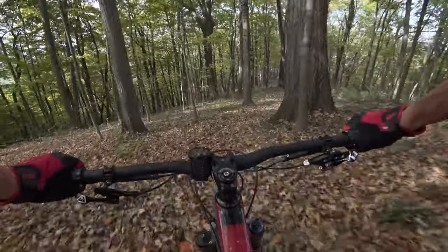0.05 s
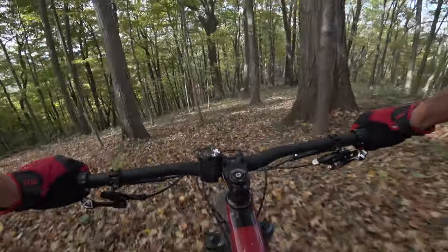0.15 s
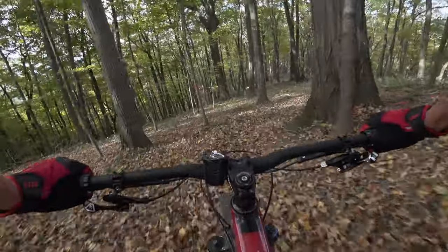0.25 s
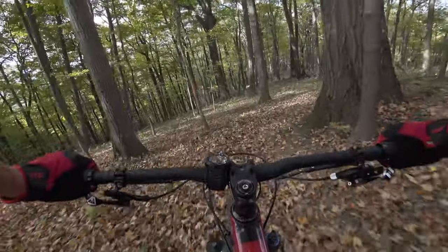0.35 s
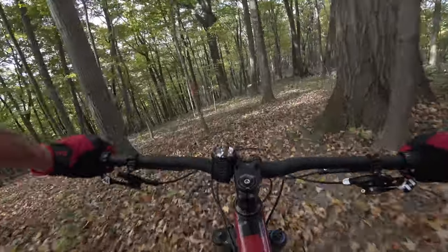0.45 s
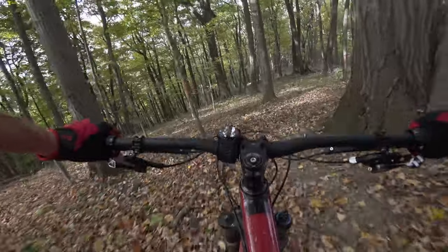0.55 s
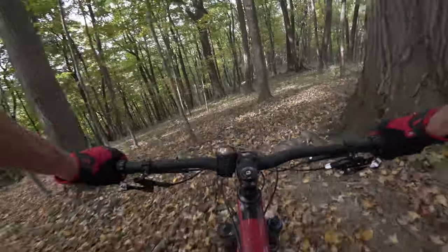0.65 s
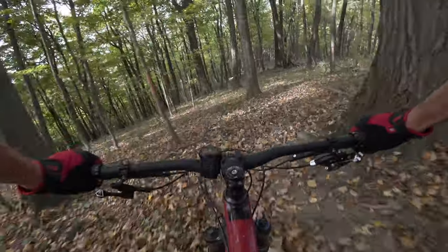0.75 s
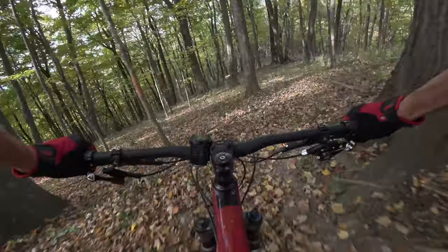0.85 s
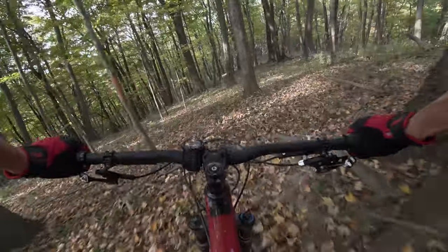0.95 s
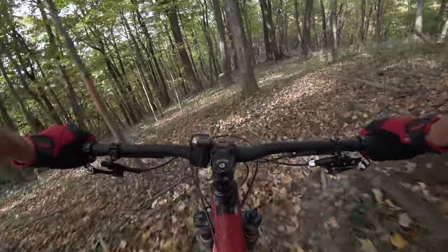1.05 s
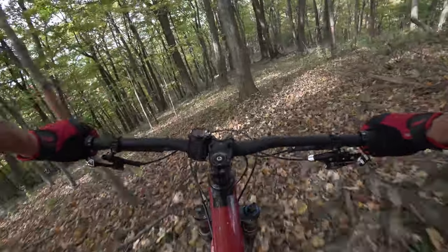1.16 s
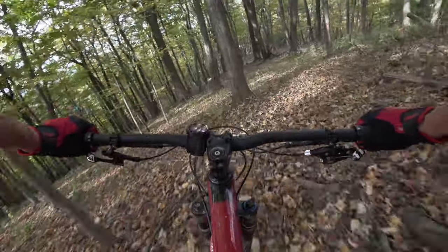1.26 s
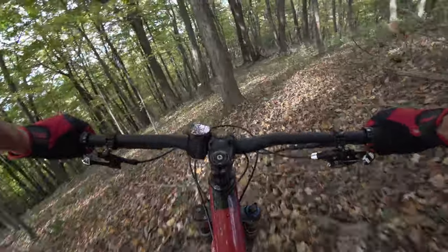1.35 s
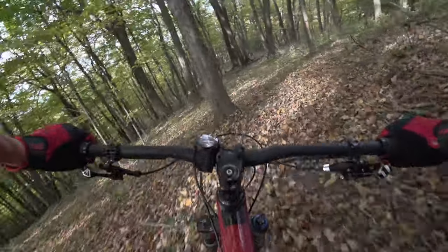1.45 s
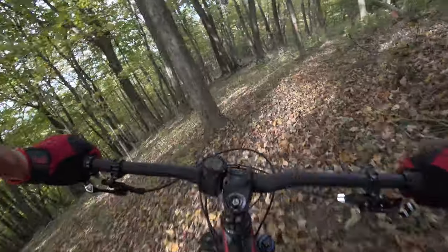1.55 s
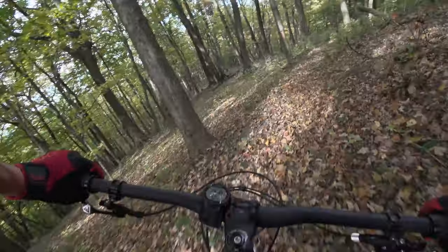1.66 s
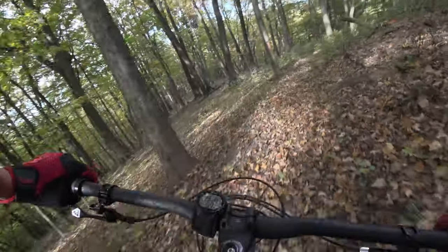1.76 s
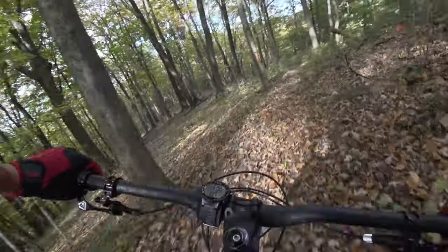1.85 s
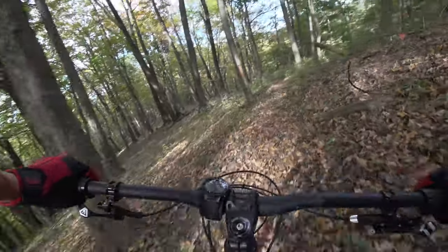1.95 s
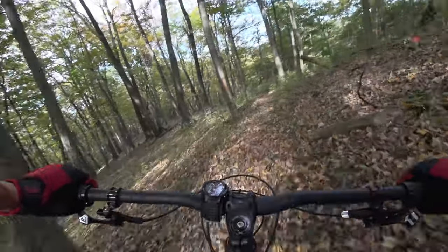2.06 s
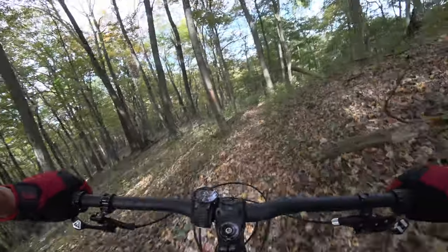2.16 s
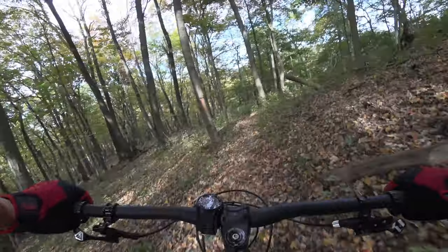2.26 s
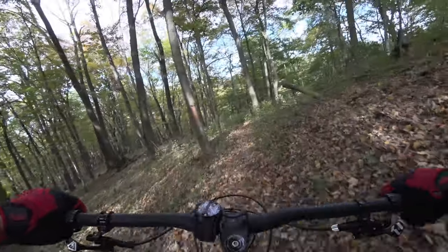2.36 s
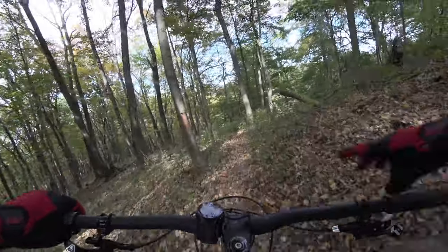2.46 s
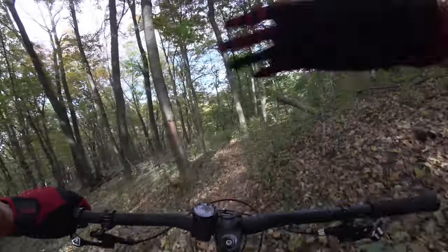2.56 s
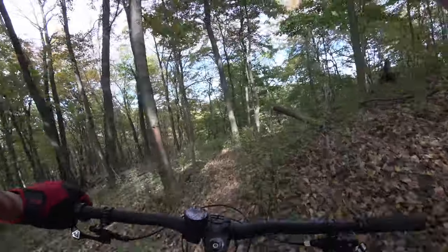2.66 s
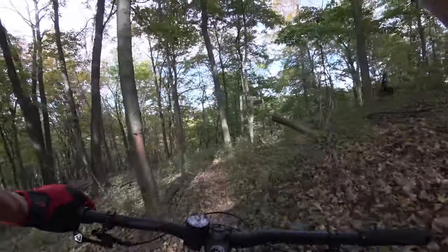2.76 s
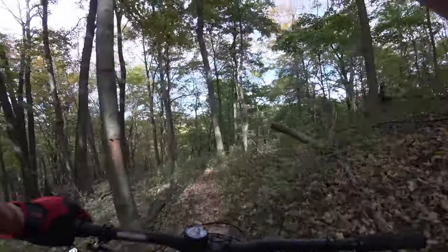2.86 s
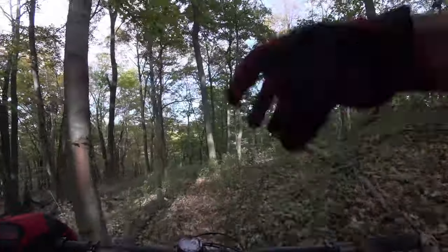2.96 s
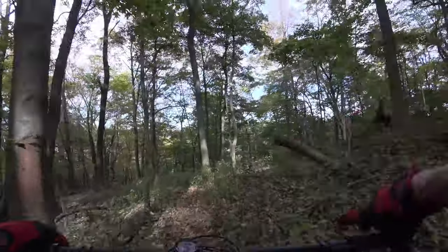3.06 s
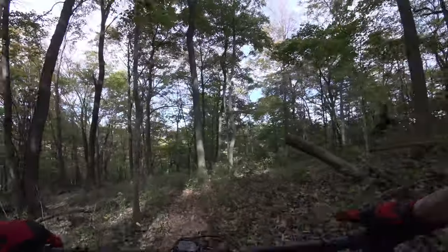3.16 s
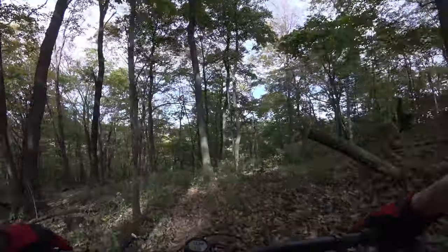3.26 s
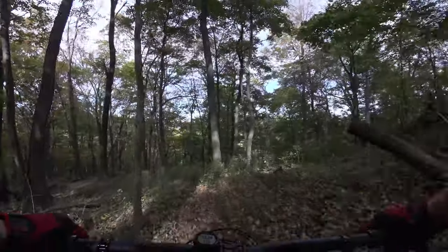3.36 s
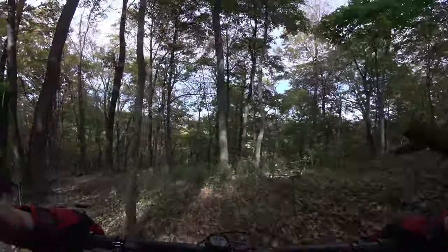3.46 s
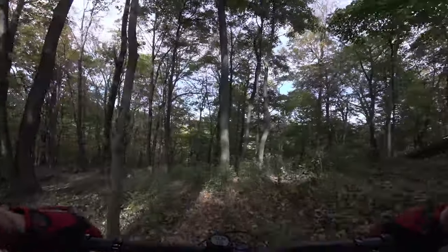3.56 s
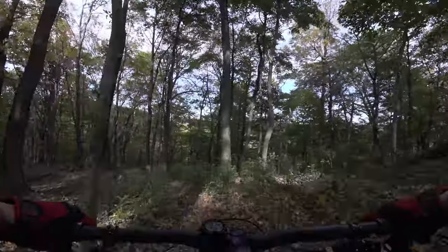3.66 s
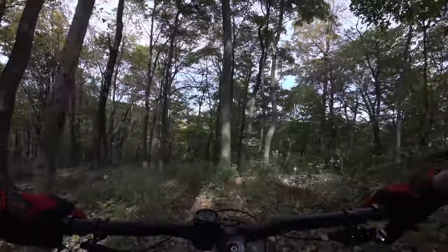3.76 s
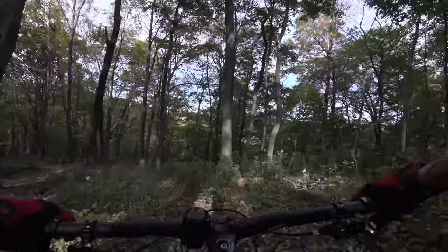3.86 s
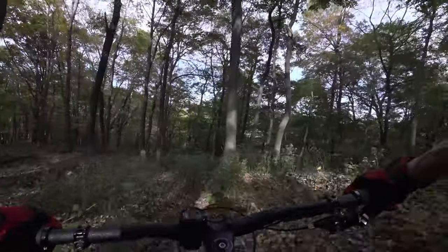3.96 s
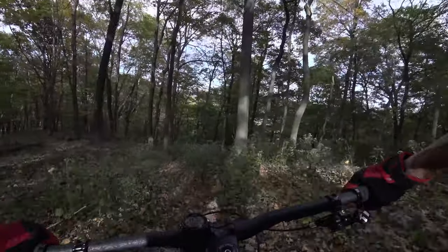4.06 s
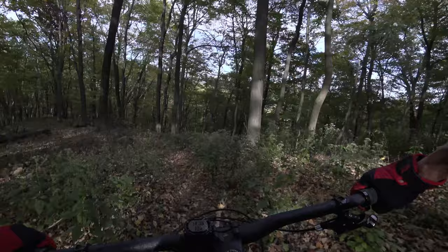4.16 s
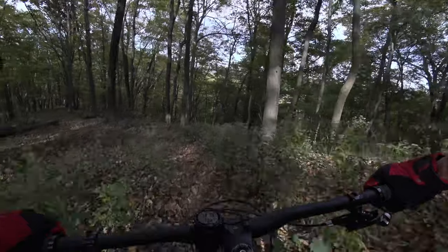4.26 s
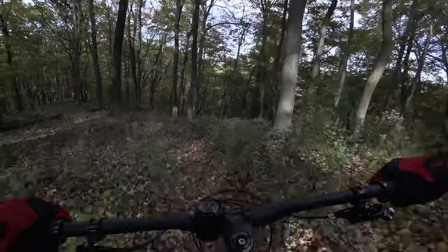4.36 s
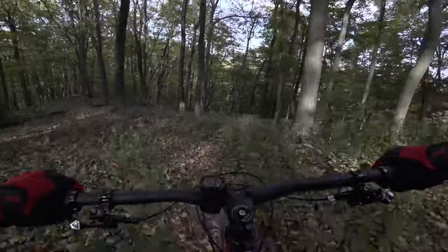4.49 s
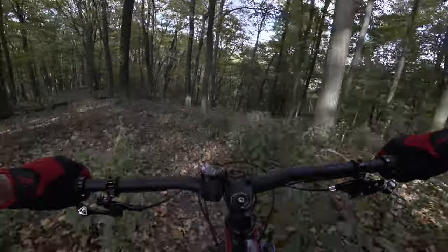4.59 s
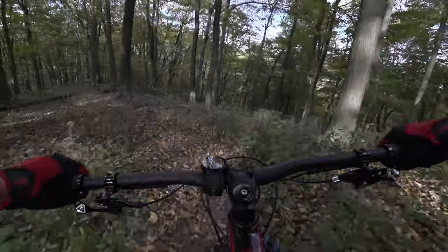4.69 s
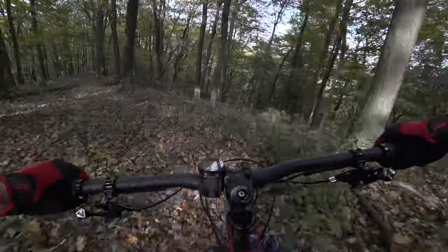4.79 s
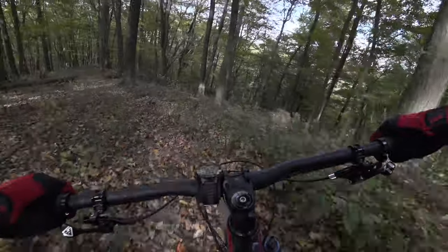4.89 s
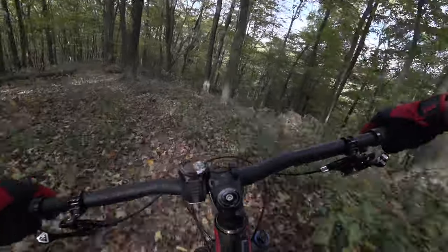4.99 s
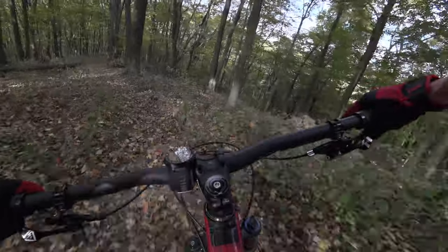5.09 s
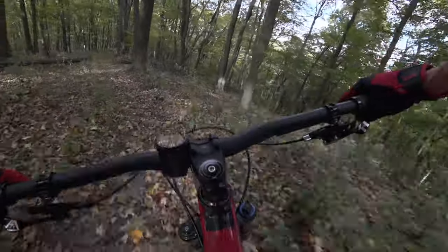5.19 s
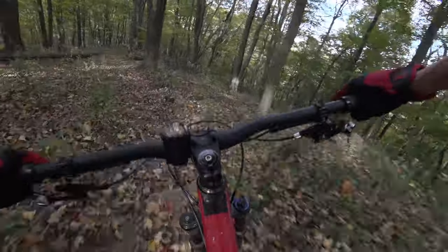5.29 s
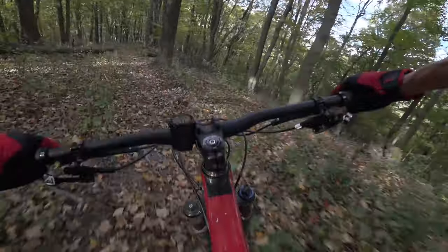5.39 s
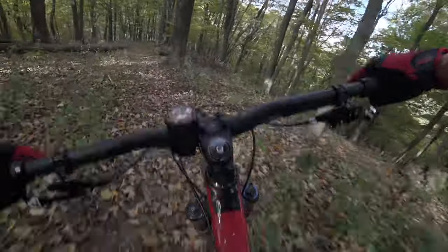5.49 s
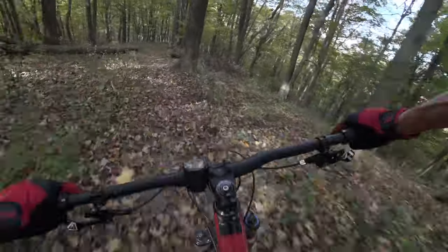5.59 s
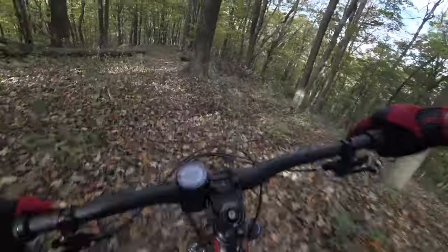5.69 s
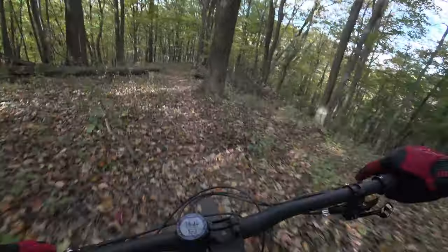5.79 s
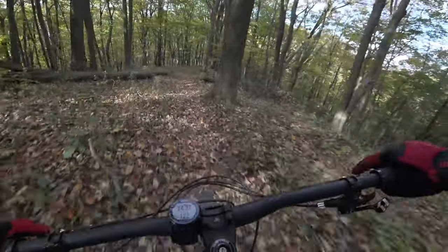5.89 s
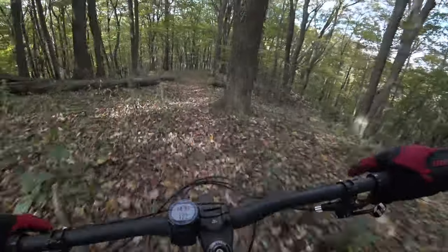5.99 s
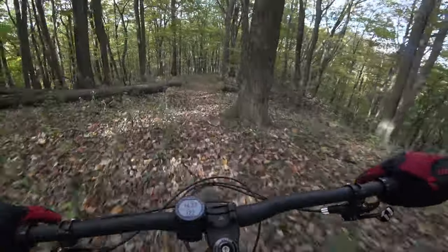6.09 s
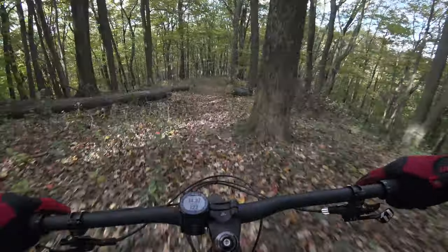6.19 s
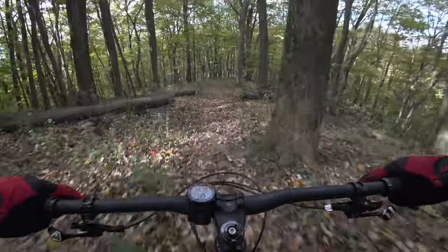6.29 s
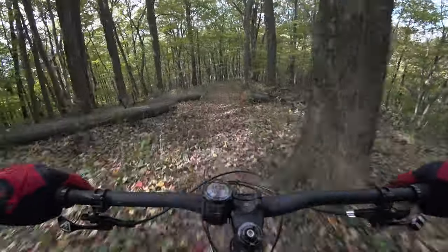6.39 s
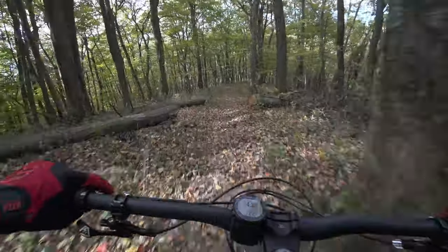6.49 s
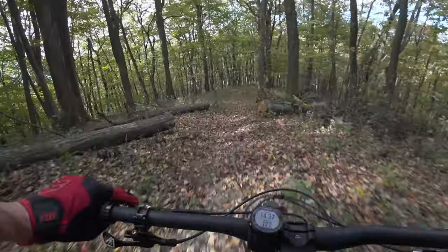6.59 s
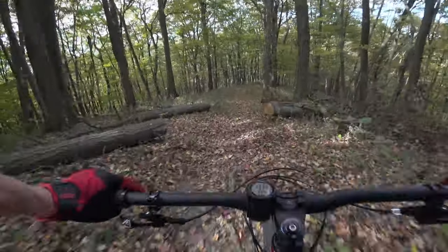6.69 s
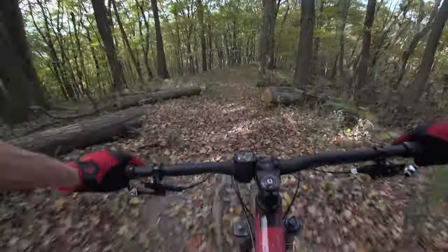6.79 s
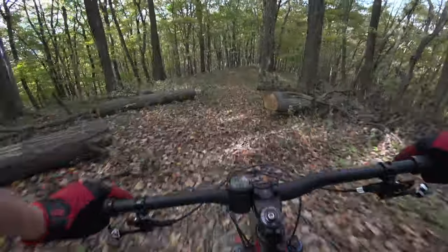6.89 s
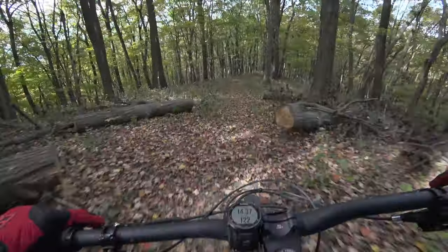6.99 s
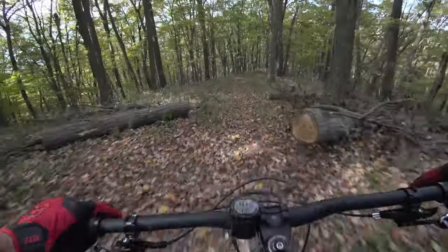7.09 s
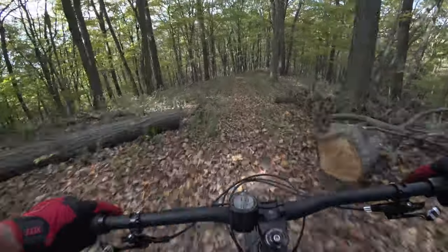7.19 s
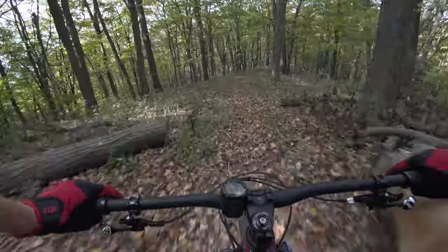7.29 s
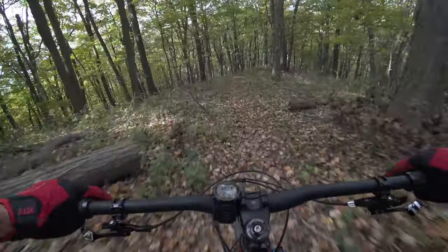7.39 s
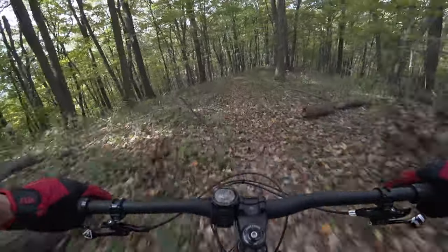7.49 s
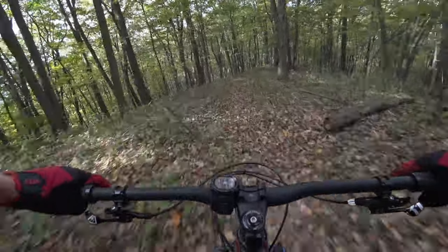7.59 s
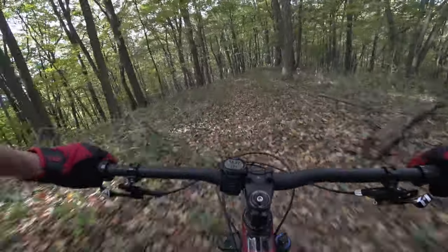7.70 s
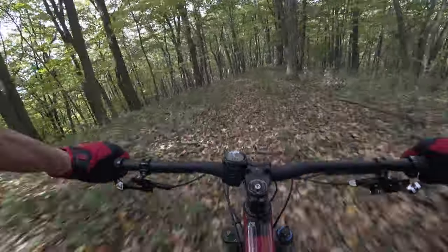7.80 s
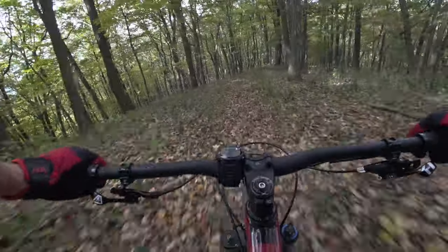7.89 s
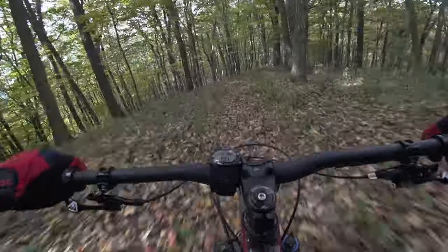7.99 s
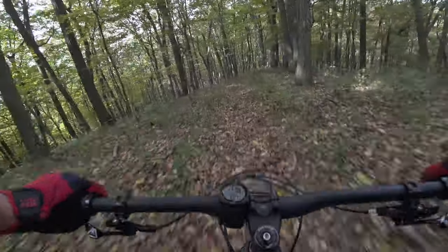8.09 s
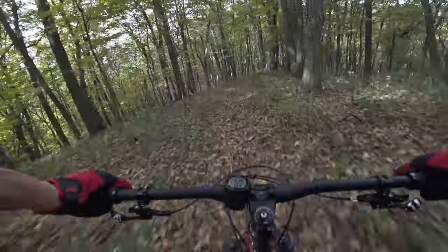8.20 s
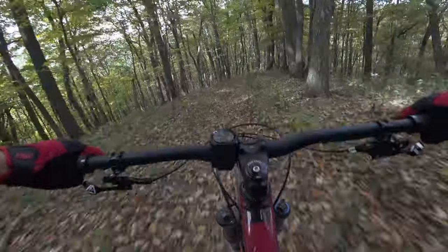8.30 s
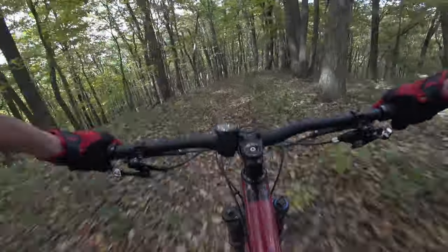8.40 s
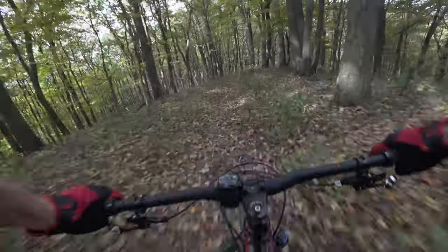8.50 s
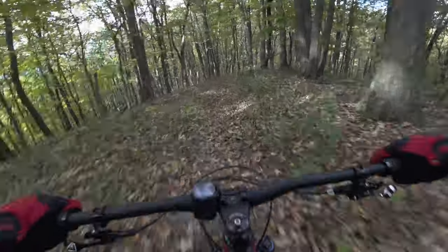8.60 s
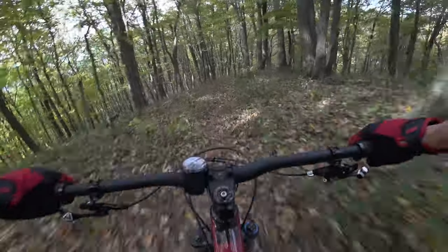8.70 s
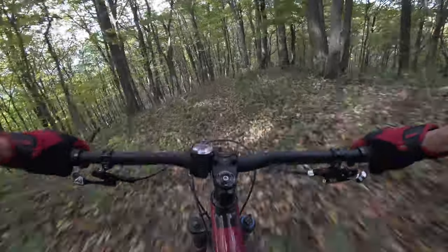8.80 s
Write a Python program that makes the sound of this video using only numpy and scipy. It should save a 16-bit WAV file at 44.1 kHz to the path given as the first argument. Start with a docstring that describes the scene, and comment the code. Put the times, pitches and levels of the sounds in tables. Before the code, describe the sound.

Heard from the rider's position, bicycle tyres plough through thick dry leaves in a dense, bright, continuous crackle. Twigs and roots knock the wheels with short woody clacks, and a brake disc squeals briefly near one second. The crackle thins around three seconds amid dull bumps and sharp snaps, then returns fuller and louder, with soft tyre drumming beneath it growing to the end.

```python
"""Dry leaves crackle densely under bicycle tyres that roll fast along a forest trail, heard by the rider.
The crackle is coloured noise gated by random cracks, with short damped tones for single leaves.
Beneath it the tyres drum and thud, as low noise beaten by uneven ground. Twigs and roots knock the wheels
as damped tones with a woody crack, single leaves snap as noise bursts, dull bumps are low damped tones,
and a brake disc sings once, a tone that swells and fades in bursts."""
import sys
import numpy as np
from scipy import signal
from scipy.fft import rfft, irfft, next_fast_len
from scipy.io import wavfile
from scipy.ndimage import uniform_filter1d, map_coordinates

SR = 44100
rng = np.random.default_rng(int(sys.argv[2]) if len(sys.argv) > 2 else 0)


def to_wav(s):
    """Save 16-bit WAV."""
    ch = np.atleast_2d(s).T  # columns
    pcm = np.round(np.clip(ch, -1, 1) * 32767)  # PCM
    wavfile.write(sys.argv[1], SR, pcm.astype(np.int16))


N = 390285  # length in samples

# Slow base levels of the ride. Each row: time in seconds, small cracks in dB, big leaves and stems in dB,
# tyre drumming in dB.
ROLL_LEVELS = [(0, -18.5, -26, -38), (0.5, -18, -26.5, -40), (1.1, -17, -24.5, -37), (1.7, -22, -29, -40.0),
               (2.4, -21, -28, -39.5), (3.1, -25, -33.5, -41), (3.7, -24, -33, -41.5),
               (4.4, -24, -30.5, -38.5), (4.9, -19.5, -27, -39), (5.4, -16, -23.5, -36),
               (6.2, -19.5, -25.5, -35.5), (6.6, -18.5, -25, -33), (7.1, -16, -23, -32.5),
               (7.8, -16.5, -23, -31.5), (8.3, -15.5, -22.5, -30), (8.85, -15.5, -22, -28)]


def amp(db):
    """Gain of a level in dB."""
    return 10 ** (np.asarray(db) / 20)


def unit(x):
    """Scale x to rms 1."""
    return x / np.sqrt(np.mean(x ** 2) + 1e-20)


def along(points, hz):
    """Read a curve of (Hz, value) points on a log frequency axis."""
    f, v = np.transpose(points)
    return np.interp(np.log(hz + 1), np.log(f + 1), v)


def curves(rows):
    """Draw one value per sample for each column after the time."""
    seconds, *columns = np.transpose(rows)
    return [np.interp(np.arange(N) / SR, seconds, column) for column in columns]


def wobble(rate):
    """A smooth random curve with rate knots a second."""
    knots = rng.standard_normal(int(N * rate / SR) + 4)
    return map_coordinates(knots, [np.arange(N) * rate / SR])


def filtered(x, response):
    """Multiply the spectrum of x by a complex response of frequency."""
    m = next_fast_len(N + SR // 4)
    return irfft(rfft(x, m) * response(np.fft.rfftfreq(m, 1 / SR)), m)[..., :N]


def high_pass(hz, edge_hz):
    """Response of two first-order high-passes in a row."""
    return (1j * hz / (edge_hz + 1j * hz)) ** 2


def cracks(rate, spread_db, life):
    """Envelope of rate random cracks a second, few large among many small, falling to 1/e in life seconds."""
    when, size = rng.random(N), rng.exponential(size=N)
    kicks = (when < rate / SR) * amp(spread_db * np.minimum(size, 4))
    return unit(signal.lfilter([1], [1, -np.exp(-1 / (life * SR))], kicks))


def grainy(spectrum, envelope, bed, grains=0):
    """Two unrelated noises of one colour, gated by the same cracks over a steady bed, plus any grains."""
    noise = rng.standard_normal((2, N)) * (bed + envelope)
    pair = unit(noise) + grains
    return unit(filtered(pair, lambda hz: amp(along(spectrum, hz))))


def dips_and_swells():
    """Brief level changes in dB: dips cut in fast, swells come more softly."""
    # Brief dips and swells of the crackle.
    # Each row: start in seconds, length in seconds, change in dB before smoothing.
    crackle_changes = [(0.02, 0.037, 2.5), (0.788, 0.035, 3.5), (1.976, 0.04, -1), (2.083, 0.027, 5.5),
                       (2.59, 0.048, -3), (2.664, 0.084, 4), (3.037, 0.015, 3.5), (3.064, 0.09, -2.5),
                       (3.215, 0.018, -6.5), (3.4, 0.085, 3.5), (3.616, 0.041, 6), (3.678, 0.05, 4.5),
                       (3.757, 0.026, -6.0), (3.951, 0.03, -3.5), (3.984, 0.031, 6), (4.023, 0.12, -4),
                       (4.164, 0.08, 4.0), (4.278, 0.032, 5), (4.43, 0.046, 5), (4.69, 0.049, -4),
                       (4.749, 0.044, -4.5), (4.854, 0.044, 3.5), (4.952, 0.064, -5.5), (5.136, 0.041, -4),
                       (5.173, 0.018, 2), (5.334, 0.034, -6), (5.506, 0.027, -8.5), (5.589, 0.023, -8.5),
                       (6.269, 0.068, -3.5), (6.67, 0.027, 3.5), (6.753, 0.038, -8.0), (6.902, 0.04, -5.5),
                       (7.217, 0.035, -5.5), (8.305, 0.25, -5.5), (8.409, 0.051, -8), (8.464, 0.056, -8)]
    t = np.arange(N) / SR
    change_db = sum(db * ((t > start) & (t < start + length)) for start, length, db in crackle_changes)
    dips = uniform_filter1d(np.minimum(change_db, 0), size=SR // 100)
    swells = uniform_filter1d(np.maximum(change_db, 0), size=SR // 35)
    return dips + swells


def tyres():
    """Uneven ground beats on the casing, louder where the crackle swells; below it lies a lower thudding."""
    # Colour of tyre air and casing. Each row: frequency in Hz, relative level in dB.
    casing_colour = [(100, -49), (175, -18), (218, -2.5), (262, -6), (340, -2.5), (490, 0), (620, -1),
                     (770, -5), (1100, -11), (1870, -120)]
    # Colour of the thudding. Each row: frequency in Hz, relative level in dB.
    thud_colour = [(12, -56), (20, -25), (139, 0), (167, -1), (190, -1), (250, -18), (420, -120)]
    # Lowest thudding of the tyres. Each row: time in seconds, level in dB.
    thudding = [(0.0, -68), (0.42, -70), (3.67, -74), (3.82, -62), (4.51, -60), (4.66, -63), (8.85, -47.5)]
    drum_db = curves(ROLL_LEVELS)[2]
    casing = grainy(casing_colour, cracks(rate=110, spread_db=1.5, life=0.0052), bed=1.3)
    thud = grainy(thud_colour, cracks(rate=18, spread_db=7, life=.05), bed=2.7)
    thud_db, = curves(thudding)
    drumming = amp(drum_db + 0.51 * dips_and_swells() + 1.4 * wobble(8)) * casing
    return drumming + amp(thud_db) * thud


def brake():
    """The pad grips and slips ever faster, so the disc's tone swells and fades in bursts."""
    # One squeal of the disc: first grip in seconds, loudest in seconds, pitch in Hz, level in dB.
    first, loudest, hz, db = (.855, .96, 1325, -16)
    swell_db_per_s, fade_db_per_s = 60, 95
    grips_per_s, grips_gained_per_s = 16.5, 85  # rate at the first grip, then its rise each second
    slip_db = 11  # drop between grips
    t = np.arange(N) / SR
    since = t - first
    grips = grips_per_s * since + grips_gained_per_s * since ** 2 / 2
    swell, fade = swell_db_per_s * (loudest - t), fade_db_per_s * (t - loudest)
    level_db = db - np.where(t < loudest, swell, fade)
    level_db += 2000 * np.minimum(since + .02, 0)  # steep rise that ends 20 ms ahead of the first grip
    level_db += 2.1 * wobble(69.9) - slip_db * np.sin(np.pi * grips) ** 4
    return amp(level_db) * np.sin(2 * np.pi * hz * t + 1.1 * wobble(90))


def bumps():
    """Dull bumps on the microphone mount: a low tone dies within a few cycles."""
    # Each row: time in seconds, strength in dB.
    bump_rows = [(3.085, -30), (3.132, -41)]
    track, t = np.zeros(N + SR), np.arange(SR // 20) / SR
    for s, db in bump_rows:
        push = amp(db + 1 - 60 * t / .03) * np.sin(2 * np.pi * 150 * t)
        track[round(s * SR):][:len(t)] += push
    return filtered(track[:N], lambda hz: high_pass(hz, 45))


def knocks():
    """Twigs and roots hit the wheels: a tone rings for a few cycles under a crack of woody noise."""
    # Each row: time in seconds, 1.5 ms before the knock sounds, strength in dB, pitch in Hz,
    # crack over knock in dB before a fixed lift.
    knock_rows = [(0.151, -2, 1200, -12), (0.672, -13, 587, 6), (0.71, -22, 1200, 8), (0.717, -18, 576, 8),
                  (1.018, -8.5, 920, -4), (1.255, -20, 495, -8), (1.696, -3, 982, -9),
                  (1.706, -3, 1150, -19), (1.714, -4, 875, -10), (2.303, -17.5, 660, 0),
                  (2.711, -10, 800, -3), (2.717, -15, 423, -10), (2.803, -26, 500, -8),
                  (2.994, -19, 700, -4), (4.292, -14, 570, 0), (5.431, -12, 1060, -0.5),
                  (5.57, -8.5, 940, -9), (5.577, -13, 553, -3), (5.766, -17, 623, 8),
                  (6.188, -4.5, 1070, -19), (6.734, -8.5, 547, -8), (6.744, -16, 660, -3),
                  (6.792, -18, 550, 5), (7.421, -13, 622, -5), (7.433, -13, 620, -23),
                  (7.492, -17, 565, -4), (7.902, -15, 557, 2), (8.107, -14, 1040, -7),
                  (8.171, -12, 590, -11), (8.176, -11, 296, 1), (8.339, -19, 576, -11),
                  (8.429, -16.5, 552, 1.5)]
    delay_s = .0015  # seconds from row time to knock
    track, t = np.zeros(N + SR), np.arange(SR // 20) / SR
    crack = rng.standard_normal((len(knock_rows), len(t)))
    crack *= amp(-60 * t / 0.028) * (1 - np.exp(-t / 0.00071))
    crack = signal.lfilter(*signal.butter(2, [1200, 3000], "band", fs=SR), crack)
    for (s, db, hz, crack_db), wood in zip(knock_rows, crack):
        decay = amp(7.0 - 60 * t * hz / 4.5)  # down 60 dB in 4.5 cycles
        ring = decay * (1 - np.exp(-t / 0.00059)) * np.sin(2 * np.pi * hz * t)
        track[round((s + delay_s) * SR):][:len(t)] += amp(db) * (ring + amp(crack_db + 9.5) * wood)

    def casing(hz):
        """The tyre rings on briefly at 570 Hz, with a resonance 90 Hz wide."""
        return 1 + 0.9 * 1j * hz * 90 / (570 ** 2 - hz ** 2 + 1j * hz * 90)

    return filtered(track[:N], lambda hz: high_pass(hz, 220) * casing(hz))


def snaps():
    """Single leaves and twigs snap: short bursts of noise, down 60 dB in 12 ms."""
    # Each row: time in seconds, strength in dB.
    snap_rows = [(0.342, -14), (2.135, -2.5), (2.8528, -6), (3.0545, 1), (3.4564, -3), (3.8591, -6),
                 (4.0074, -7), (4.0167, -2.5), (5.5018, -21), (5.568, -16), (8.4291, -21), (8.457, -7)]
    track, t = np.zeros(N + SR), np.arange(SR // 20) / SR
    bursts = rng.standard_normal((len(snap_rows), len(t))) * amp(-60 * t / .012)
    for (s, db), burst in zip(snap_rows, bursts):
        track[round(s * SR):][:len(t)] += amp(db - 3.0) * burst
    return filtered(track[:N], lambda hz: high_pass(hz, 2500) / (1 + 1j * hz / 9000))


def pings(rate, low_hz, high_hz, cycles, spread_db, size):
    """Single leaves breaking: damped tones of size samples, each with its own pitch and place left or right."""
    when, pitch, big, place = rng.random((round(rate * N / SR), 4)).T
    hz = (low_hz * (high_hz / low_hz) ** pitch)[:, None]
    t = np.arange(size) / SR
    age = t * hz / cycles
    tone = hz * age * np.exp(-age) * np.sin(2 * np.pi * hz * t)  # higher tones die sooner, so start stronger
    tone *= amp(-spread_db * np.log(big + 0.039))[:, None]
    at = ((when * N).astype(int)[:, None] + np.arange(size)).ravel()

    def laid_out(weight):
        return unit(np.bincount(at, (tone * weight[:, None]).ravel(), N + size)[:N])

    return np.array([laid_out(np.ones_like(place)), laid_out(2 * place - 1)])  # common, scattered


def patchy(pair, depth_db):
    """Each clump of leaves has its own colour: random gain in patches about 700 Hz wide and 35 ms long."""
    z = signal.stft(pair, nperseg=512)[2]
    field = uniform_filter1d(rng.standard_normal(z.shape[1:]), size=8, axis=0)
    field = uniform_filter1d(field, size=6, axis=1)
    return signal.istft(z * amp(depth_db * unit(field)), nperseg=512)[1][:, :N]


def leaves():
    """Small cracks make the treble; big leaves and stems share their clumps but crack on their own too."""
    # Colour of small leaf cracks. Each row: frequency in Hz, relative level in dB.
    fine_colour = [(1350, -32.5), (2350, -7.5), (2950, -3.5), (3600, -3), (4350, -0.5), (5000, -2),
                   (6000, -2), (6500, -2), (7400, -0.5), (8900, -5), (10800, -3.5), (12500, -7),
                   (15100, -10.5), (16000, -10.5)]
    # Colour of big leaves and stems. Each row: frequency in Hz, relative level in dB.
    coarse_colour = [(460, -43), (780, -16), (930, -4.5), (1230, -2.5), (1340, 0.5), (1920, 1.5),
                     (2320, -5), (2500, -4), (3250, -2), (5500, -120)]
    crackle_db, stems_db, _ = curves(ROLL_LEVELS)
    quick_db = dips_and_swells() + 1.0 * wobble(12)  # quick changes of the crackle
    clumps = 0.63 * wobble(20) + 1.18 * wobble(45)
    shared = cracks(rate=1400, spread_db=4.5, life=0.0067)
    small = .45 * pings(rate=900, low_hz=2385, high_hz=15140, cycles=2.9, spread_db=1.5, size=400)
    large = .4 * pings(rate=600, low_hz=802, high_hz=2627, cycles=1.3, spread_db=-0.5, size=400)
    fine_db = crackle_db + quick_db + clumps
    fine = amp(fine_db) * grainy(fine_colour, shared, bed=1.6, grains=small)
    coarse_db = stems_db + 0.81 * quick_db + 0.3 * clumps + 1.35 * wobble(25)
    coarse = amp(coarse_db) * grainy(coarse_colour, shared, bed=2.4, grains=large)
    top = filtered(fine, lambda hz: 1 / (1 + (9500 / (hz + 1)) ** 6))
    top_change = amp(0.27 * dips_and_swells() + 0.22 * wobble(18)) - 1  # dips are duller, swells brighter
    return patchy(fine + coarse + top_change * top, depth_db=0.98)


def scene():
    """Both ports hear nearly the same; scattered sound adds a small part that differs."""
    # Left-right likeness of leaves and tyres. Each row: frequency in Hz, correlation from -1 to 1.
    alike = [(30, .97), (120, .94), (500, .97), (1500, .98), (2500, .94), (3600, .95), (4500, .985),
             (8000, .992), (9000, .985), (15000, .985)]
    common, scattered = leaves() + tyres()
    points = knocks() + bumps() + snaps() + brake()

    def turn(hz):
        """Angle in radians that shares the sound between middle and side."""
        return np.arccos(np.clip(along(alike, hz), -1, 1)) / 2

    mid = filtered(common, lambda hz: np.cos(turn(hz))) + points
    side = filtered(scattered, lambda hz: np.sin(turn(hz)))
    return np.array([mid + side, mid - side])


def record(dry):
    """The ports differ a little in level and phase, peaks are rounded off, nothing passes the band limit."""
    # Level balance of the ports. Each row: frequency in Hz, left over right in dB.
    lean = [(100, 0.2), (1000, -0.1), (8000, -0.3), (8600, -2.6), (15000, -1.6)]
    # Phase between the ports. Each row: frequency in Hz, lead of the left in radians.
    lead = [(0, 0), (780, 0.39), (3530, -0.0), (16600, 0.0)]
    top_hz = 15750
    half = np.array([[.5], [-.5]])  # left takes half the difference, right the opposite half

    def port_response(hz):
        return amp(half * along(lean, hz)) * np.exp(1j * half * along(lead, hz))

    ports = filtered(dry, port_response)
    rounded = ports / (1 + np.abs(ports / .8) ** 4) ** (1 / 4)
    return filtered(rounded, lambda hz: hz < top_hz)


dry = scene()
out = record(dry)
to_wav(out)
```